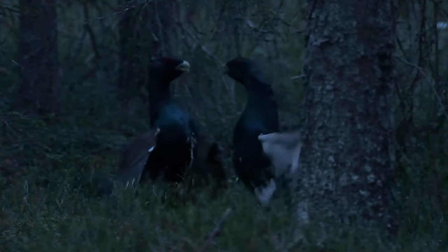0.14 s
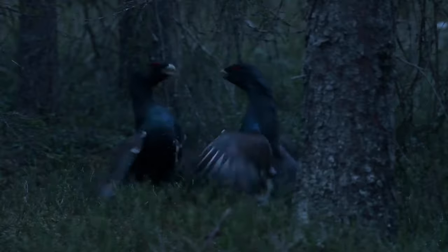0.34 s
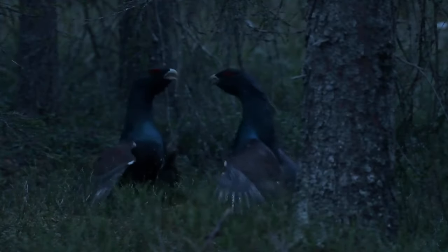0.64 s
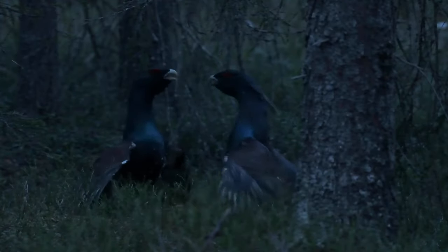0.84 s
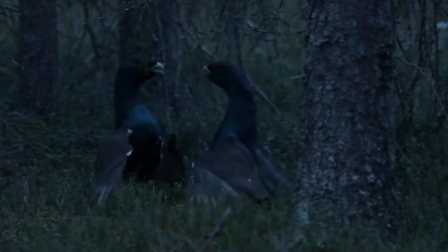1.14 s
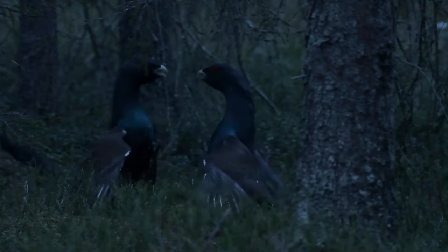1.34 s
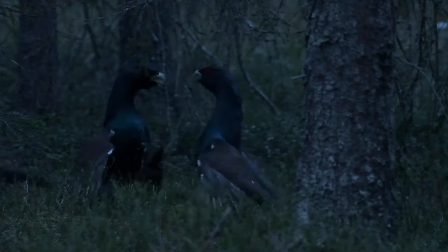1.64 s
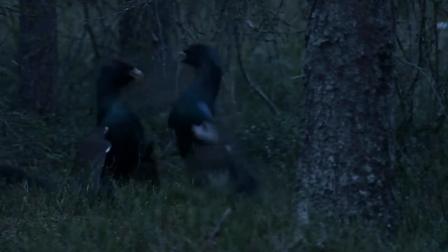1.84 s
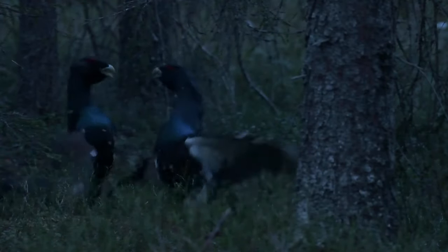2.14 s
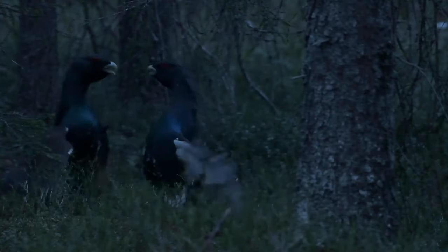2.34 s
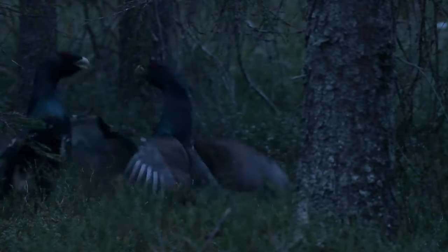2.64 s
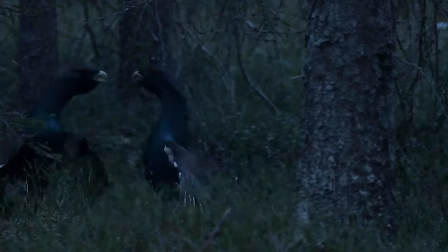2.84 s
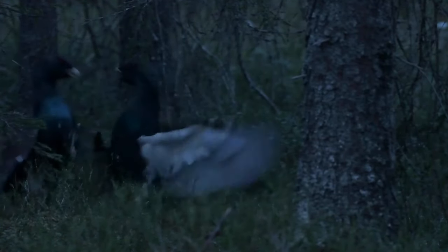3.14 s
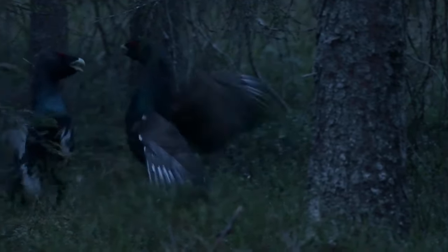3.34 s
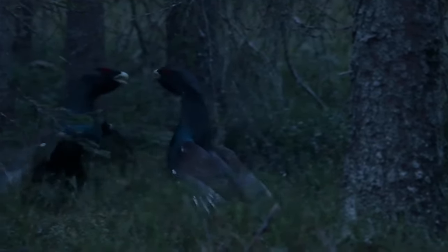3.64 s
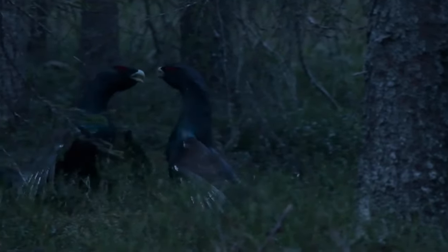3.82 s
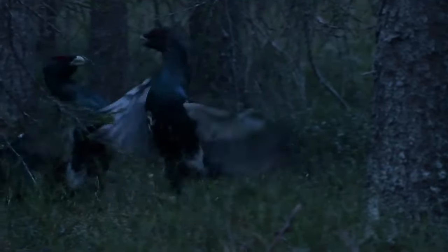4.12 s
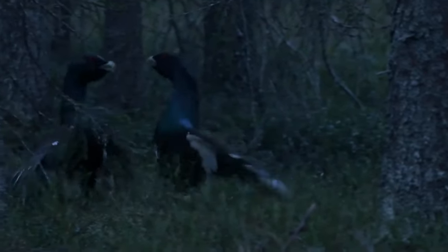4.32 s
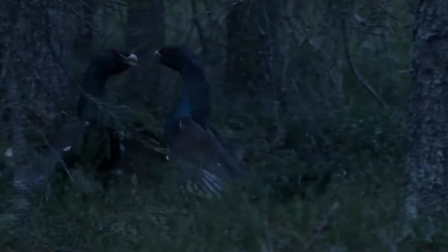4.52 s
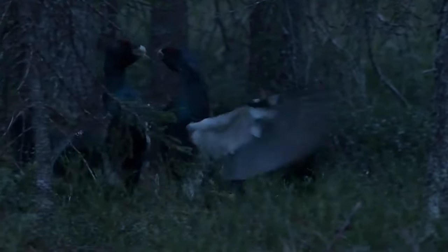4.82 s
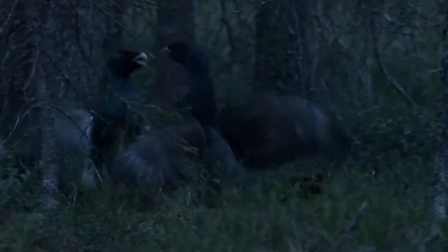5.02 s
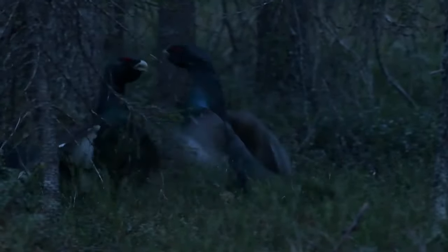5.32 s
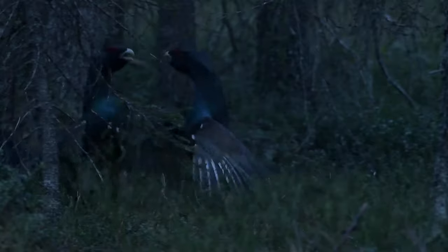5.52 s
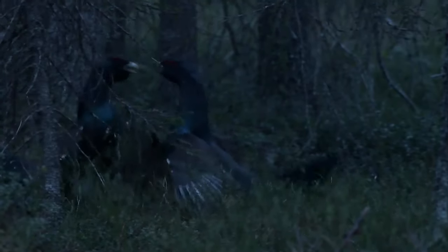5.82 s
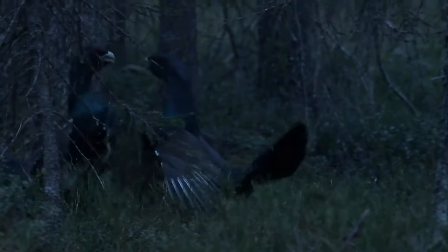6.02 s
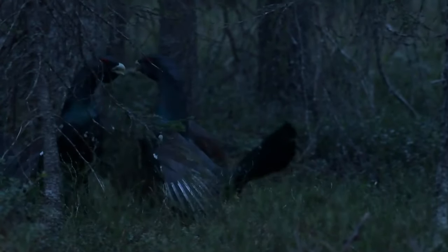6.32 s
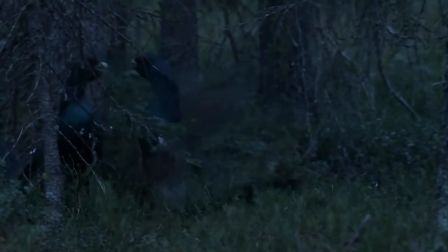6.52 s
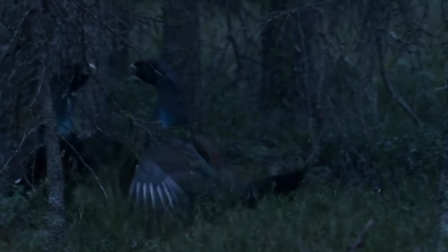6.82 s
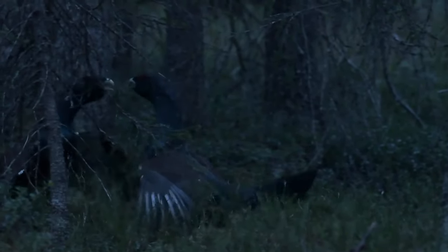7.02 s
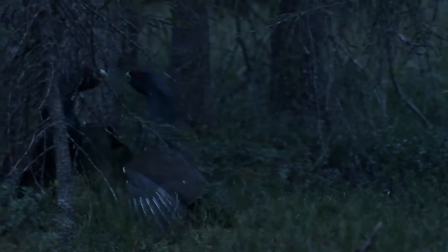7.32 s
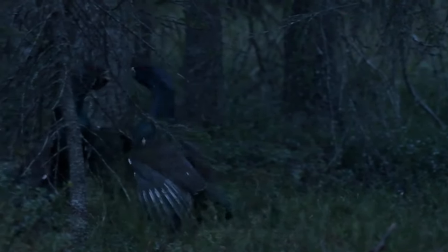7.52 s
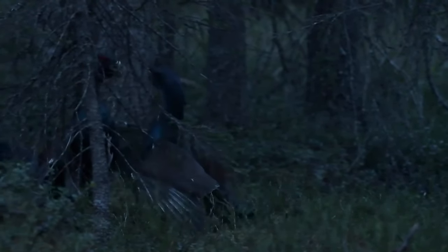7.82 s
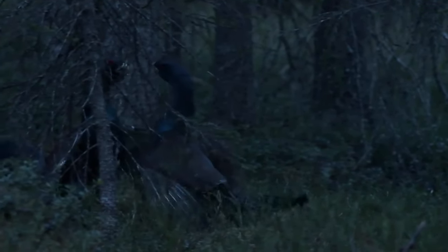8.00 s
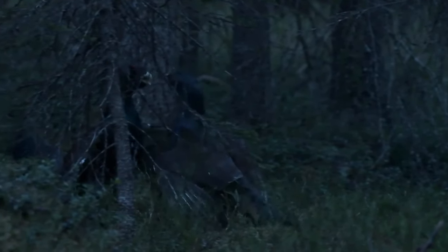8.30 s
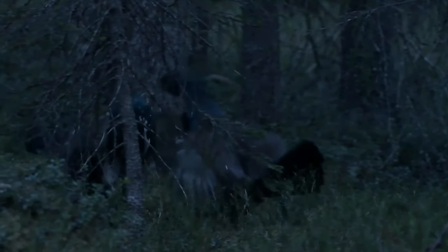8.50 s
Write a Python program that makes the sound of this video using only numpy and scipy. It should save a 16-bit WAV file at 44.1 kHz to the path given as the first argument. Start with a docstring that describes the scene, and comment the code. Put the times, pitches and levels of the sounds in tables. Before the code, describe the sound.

Quiet forest air with faint hiss; two large grouse cocks fight right of centre in the stereo picture. At 0.35 s a short wing swish ends in a sharp, crackling slap with a low chest thud and trailing feather rustle. Near stillness follows until a harder blow at 1.95 s, then another at 2.55 s amid shuffling feathers. A soft cluck and a brief wheeze lead to two quick strikes at 3.3 and 3.5 s; dull clucks follow at 3.7 s. A strong slap lands at 4.1 s, a cluck at 4.55 s, then a flurry from 4.95 to 5.4 s with loose quill snaps. Around 5.6-6.1 s come dry, bright throat clicks, a faint wheeze and popping clucks; more clucks run to 6.55 s. The last big blow hits at 6.65 s, crackling away. One low cluck at 7.2 s, then quiet until faint clucks, rustle and a tiny wheeze after 8.45 s. Trunks return faint, dull echoes.

```python
"""Moss among spruce trunks: two forest grouse cocks fight to the right of a small stereo microphone.
Wings sweep and rustle as grainy noise; blows slap with shaped noise over decaying chest tones, and
quills crack as short noise bursts. Between blows come dry throat clicks (gliding tones and resonant
snaps), low clucks (doubled pops) and short wheezes (resonant noise), with echoes, still air and hiss."""
import sys
import numpy as np
from scipy import signal
from scipy.fft import rfft, irfft
from scipy.io import wavfile
from scipy.ndimage import uniform_filter1d

SR = 44100
rng = np.random.default_rng(int(sys.argv[2]) if len(sys.argv) > 2 else 0)


def amplitude_ratio(level_db):
    """Convert a level in decibels to the matching linear amplitude (field) ratio."""
    exponent = np.asarray(level_db, float) / 20
    return 10 ** exponent


def transcribe(u):
    """Save the signal u as a 16-bit wav file named by the first command-line argument.

    u: samples, shape (n,) or (channels, n), limited to [-1, 1]; the rate is SR.
    q: integer samples, one column per channel.
    """
    v = np.clip(np.atleast_2d(u).T, -1, 1)
    q = np.round(v * 32767).astype(np.int16)
    wavfile.write(sys.argv[1], SR, q)


N = 381906  # samples

# Still air, shared and opposed parts. Each row: frequency in Hz, relative density in dB per Hz.
AIR_MID_HZ_DB = [(25, -14), (60, -7), (110, 0.5), (400, 1), (900, -2.5), (2000, -4.5), (6000, -8.5),
                 (10000, -12.5), (15000, -9)]
AIR_SIDE_HZ_DB = [(30, -8), (130, -37), (300, -18.5), (600, -8), (1900, -3), (6000, -9.5), (10000, -13),
                  (15000, -10.5)]
AIR_MID_RMS_DB = -64

# Wing strokes. Each row: impact in seconds, wind-up in seconds, wind-up level in dB,
# level of the flurry just after in dB, level of the trailing rustle in dB, brightness in dB.
STROKES = [(0.344, 0.17, -63, -47, -55.5, -4), (1.944, 0.09, -57.5, -35.5, -50.5, -6),
           (2.556, 0.11, -55.5, -47, -50.5, -6), (3.306, 0.11, -59, -43, -53.5, -3),
           (3.494, 0.084, -60.5, -44.5, -55.5, -2), (4.111, 0.08, -55, -36.5, -51, -3),
           (4.979, 0.11, -58.5, -42.5, -52.5, -0.5), (5.287, 0.15, -59.5, -45, -53.5, -0.5),
           (6.643, 0.13, -56, -44, -53.5, -1.5)]
WINDUP_RISE_DB, WINDUP_LOW_DB = 21.5, -4  # a swinging wing hisses higher than a settling one
FLURRY_LAG_S, FLURRY_DB_PER_S, TRAIL_DB_PER_S = 0.014, 382, 62.5
BRIGHT_DULLING_DB_PER_S, UPPER_DULLING_DB_PER_S = 10, 12  # added to the fall of the tail
LUMP_DB, LUMPS_PER_S = 1.6, 45
# Feathers shuffled without a blow. Each row: peak in seconds, level in dB, brightness in dB.
SHUFFLES = [(0.762, -76, -16), (2.36, -75, -1), (2.64, -57, -14), (3.0, -70, -4), (3.39, -67, 8),
            (3.73, -66.5, -7), (4.535, -64, 1), (8.475, -66, -7), (8.58, -73, 4)]
SHUFFLE_RISE_DB_PER_S, SHUFFLE_FALL_DB_PER_S = 144, 99
# Rustle spectrum. Each row: frequency in Hz, relative density in dB per Hz.
FEATHER_HZ_DB = [(150, -38), (250, -33), (538, -4.5), (711, 0.5), (1180, -4), (1310, -3), (1970, 1),
                 (3210, -10.5), (5760, -53), (7000, -9), (9100, -31), (15400, -120)]

# Wing blows. Each row: start in seconds, slap level in dB, thud level in dB, thud pitch in Hz.
BLOWS = [(0.344, -30, -37.3, 115), (0.749, -72, -55, 116), (1.898, -53, -53, 127), (1.945, -29.5, -37, 115),
         (2.505, -62, -55, 115), (2.556, -26.5, -36.5, 112), (3.308, -31.5, -31, 170),
         (3.494, -29.5, -44, 93.4), (4.072, -66, -53, 120), (4.111, -29.5, -37, 112),
         (4.935, -64, -55, 125), (4.979, -31.5, -32, 160), (5.154, -38, -36.5, 133), (5.233, -46, -52, 130),
         (5.286, -33.5, -37.5, 122), (5.804, -53, -56, 109), (6.545, -68, -60, 140),
         (6.644, -30, -38.5, 123), (7.226, -66, -60, 140)]
# Slap spectrum. Each row: frequency in Hz, relative density in dB per Hz.
SLAP_HZ_DB = [(150, -41), (250, -0.5), (1840, 2), (2460, 4.5), (2910, -21), (3840, -2), (4610, -14.5),
              (6350, -0.5), (7000, -15), (9100, -8.5), (15400, -120)]
# Chest resonances. Each row: frequency in Hz, width in Hz, gain in dB.
CHEST_MODES = [(102, 100, 6), (162, 72, -2), (260, 110, -26)]
SLAP_T60_S, THUD_T60_CYCLES = 0.069, 11.6

# Quill cracks, loud ones in the blows and faint ones standing alone.
# Each row: peak in seconds, level in dB, centre in Hz, brightness in dB.
CRACKS = [(0.3475, -31, 1800, -15), (0.351, -19.5, 2100, 1), (0.3713, -39, 1700, -6),
          (1.8996, -45, 1500, -8), (1.945, -25, 1400, -21), (1.9508, -17, 2027, -4),
          (1.956, -25, 1885, -12), (1.9647, -27, 1770, -20), (1.9809, -27.5, 1920, -20),
          (1.9835, -30, 1900, -3.5), (2.054, -39, 1980, -11), (2.0568, -37, 1620, -11),
          (2.4865, -47, 2500, 25), (2.511, -42, 1580, -10), (2.5155, -37.5, 1400, -16),
          (2.5567, -25, 1670, -14), (2.5605, -19, 2290, -5), (2.5796, -31, 1200, -6),
          (2.8262, -46, 1700, -2), (2.8684, -50, 2100, 7), (3.2649, -48, 1200, 3),
          (3.3102, -26.5, 1080, -27), (3.316, -21, 1400, -5), (3.3825, -39, 1750, 12),
          (3.3939, -41.5, 1900, 2), (3.4907, -32, 2300, 4), (3.4953, -19, 2070, -11), (3.499, -19, 2020, 0),
          (3.5107, -32, 1700, 3), (3.6512, -44.5, 2800, -5), (4.1134, -17.5, 1300, -22),
          (4.1166, -19, 1630, -11), (4.119, -21, 1890, -2), (4.1218, -24.5, 1980, -19),
          (4.144, -35, 1700, 9), (4.1533, -28.5, 1200, 3), (4.224, -34, 1800, -7), (4.5425, -43, 2200, -2),
          (4.9363, -44, 1900, -15), (4.9779, -26, 1300, -5), (4.9841, -20, 1600, -2),
          (5.1477, -44, 1200, -8), (5.1525, -32, 1520, -20), (5.156, -35, 1770, 2),
          (5.1621, -30.5, 2180, 2), (5.2277, -43, 2000, 8), (5.2345, -31.5, 1900, -8),
          (5.2863, -28, 2100, -4), (5.29, -30, 1920, -9), (5.3094, -28, 2400, 6),
          (5.3228, -30.5, 1400, -11), (5.3705, -39, 2200, -1), (5.3934, -41, 1800, -6),
          (5.4001, -33.5, 2000, -2), (5.4235, -40, 1920, -1), (6.6045, -47, 1900, -22),
          (6.6236, -39, 1900, 0), (6.6403, -30, 2000, 0), (6.6474, -24, 1640, -7), (6.6567, -33, 2400, -6),
          (6.7375, -34.5, 2420, -2), (6.757, -35.5, 2420, -8), (6.777, -42, 1610, 3),
          (6.888, -50, 2500, 12), (8.459, -49, 1500, -8), (8.4645, -48, 1710, -10), (8.489, -49, 1700, -5)]
CRACK_T60_S, FAINT_T60_S_PER_DB = 0.005, 0.0002  # fainter cracks last longer
# Cracks scattered after each stroke; the level is relative to its trailing rustle.
LOOSE_MEAN_DELAY_S, LOOSE_DB, LOOSE_SPREAD_DB = 0.07, 8, 3.5
LOOSE_HZ, LOOSE_BRIGHT_DB = 1600, -5.5

# Low clucks. Each row: start in seconds, pop level in dB, pitch in Hz, hiss level in dB, squeak level in dB.
CLUCKS = [(3.094, -65.5, 760, -54, -64), (3.7, -49, 703, -54.5, -53.5), (3.712, -55, 680, -53, -54.5),
          (3.756, -66, 610, -60, -59), (4.562, -56, 680, -56, -62.5), (5.779, -48, 690, -50.5, -61.5),
          (5.812, -57, 640, -68, -70), (5.91, -73.5, 805, -48.5, -66), (6.242, -54.5, 684, -68.5, -67.5),
          (6.267, -52.5, 770, -60.5, -71), (6.285, -46.5, 680, -51.5, -63), (6.415, -50.5, 675, -73, -69.5),
          (6.467, -69, 641, -57.5, -65.5), (6.543, -55.5, 660, -60.5, -67.5),
          (7.226, -54.5, 680, -49.5, -63), (8.457, -56, 736, -68.5, -61), (8.487, -53, 740, -55.5, -62.5)]
# Cluck hiss and squeak resonances. Each row: frequency in Hz, width in Hz, gain in dB.
CLUCK_HISS_MODES = [(1400, 2700, -10), (6140, 940, 1.5), (7950, 1100, 4), (10000, 1300, -4),
                    (12400, 1000, -12)]
SQUEAK_MODES = [(3700, 200, 0)]

# Wheezes. Each row: start in seconds, length in seconds, level in dB, swell from start to end in dB.
WHEEZES = [(3.173, 0.065, -55.5, -4.5), (5.565, 0.083, -63, 6), (8.614, 0.02, -59, -3)]
# Throat resonances. Each row: frequency in Hz, width in Hz, gain in dB.
BREATH_MODES = [(2120, 300, 0), (2720, 300, -13), (5000, 1200, -7)]
WHEEZE_EDGE_S = 0.0068

# Throat clicks. Each row: start in seconds, ring level in dB, settled pitch in Hz,
# ring time constant in seconds, snap peak in dB.
CLICKS = [(5.6444, -29.5, 1990, 0.0055, -22), (5.6605, -28.3, 1910, 0.002, -46.5),
          (5.7939, -37.5, 1940, 0.0025, -44.5), (5.8582, -57, 2000, 0.0049, -60),
          (6.127, -26.5, 1970, 0.0045, -23.5)]
# Snap resonances. Each row: frequency in Hz, width in Hz, gain in dB.
SNAP_MODES = [(1300, 600, -14), (2680, 990, 6), (3600, 900, -7), (4740, 740, 3.5), (6600, 810, -9),
              (8600, 1500, -6)]

# Difference between the ports. Each row: frequency in Hz, share from 0 to 1.
FACING_HZ_SHARE = [(200, 0), (400, 0.1), (700, 0.4), (1300, 0.75), (2400, 1.), (4400, 0.63), (8000, 1.),
                   (14000, 0.7)]
# Phase spread of that difference. Each row: frequency in Hz, spread in radians at scatter 1.
SCATTER_HZ_RAD = [(300, .1), (700, 0.53), (1400, 0.34), (3000, 0.84), (7000, 0.59), (12000, 3.8)]
FOREST_T60_S, FOREST_DB = 0.56, -22

# Treble response. Each row: frequency in Hz, gain in dB.
TREBLE_HZ_DB = [(6300, 0.5), (7100, -2), (8300, -7), (12000, -3.5), (15000, -10.5)]
# Narrow treble gaps. Each row: frequency in Hz, width in Hz, depth in dB.
GAPS = [(7630, 406, 17.5), (9630, 228, 27)]
TOP_HZ = 15740


def on_hz(table, n):
    """A (Hz, value) table interpolated over log frequency on the bins of an n-point transform."""
    hz, value = np.transpose(table)
    return np.interp(np.log(np.fft.rfftfreq(n, 1 / SR) + 1), np.log(hz), value)


def colour(x, db):
    """Gain in dB on every bin."""
    return irfft(rfft(x) * amplitude_ratio(db), x.shape[-1])


def unit(x):
    """Scaled to rms 1."""
    return x / np.sqrt(np.mean(x ** 2, axis=-1, keepdims=True))


def band(x, lo_hz, hi_hz):
    """Band-pass."""
    return signal.sosfilt(signal.butter(2, [lo_hz, hi_hz], "bandpass", fs=SR, output="sos"), x)


def low_pass(hz):
    """Second-order low-pass sections."""
    return signal.butter(2, hz, fs=SR, output="sos")


def resonate(x, modes):
    """Sum of two-pole resonances (Hz, width in Hz, dB)."""
    return sum(amplitude_ratio(db) * signal.lfilter(*signal.iirpeak(hz, hz / width_hz, SR), x)
               for hz, width_hz, db in modes)


def fade(length_s, t60_s, rise_s):
    """Quick rise, exponential decay."""
    t = np.arange(int(length_s * SR)) / SR
    return (1 - np.exp(-t / rise_s)) * amplitude_ratio(-60 * t / t60_s)


def add(track, start_s, sound):
    """Mix a sound into the track."""
    i = int(start_s * SR)
    track[..., i:i + sound.shape[-1]] += sound[..., :N - i]


def grainy(grains_per_s, spread_db):
    """Noise whose level jumps from grain to grain, as barbs slip past each other."""
    k = int(SR / grains_per_s)
    jumps = np.minimum(rng.exponential(size=N // k + 1), 3)
    smooth = uniform_filter1d(np.repeat(jumps, k), k // 2)[:N]
    return rng.standard_normal(N) * amplitude_ratio(spread_db * smooth)


def place(x, rightward, scatter):
    """Ports alike in the bass; higher up the left is shadowed and housing detours scatter the phase."""
    detours_s, turns = rng.uniform(0.00021, 0.0014, (6, 1)), rng.uniform(0, 1, (6, 1))
    ripple = np.cos(2 * np.pi * (detours_s * np.fft.rfftfreq(N, 1 / SR) + turns)).sum(axis=0)
    phase_rad = scatter * on_hz(SCATTER_HZ_RAD, N) * unit(ripple)
    lean = rightward * on_hz(FACING_HZ_SHARE, N) * np.exp(1j * phase_rad)
    side = irfft(rfft(x) * lean, N)
    return np.array([x - side, x + side])


def air():
    """Still air and hiss: bass shared by both ports, treble unrelated, left port a little fainter."""
    mid = colour(rng.standard_normal(N), on_hz(AIR_MID_HZ_DB, N))
    side = colour(rng.standard_normal(N), on_hz(AIR_SIDE_HZ_DB, N))
    side = side - 0.16 * band(mid, 800, 11000)
    return amplitude_ratio(AIR_MID_RMS_DB) / np.std(mid) * np.array([mid + side, mid - side])


def feather_power():
    """Low, upper and bright rustle power: a swelling wind-up, a quick flurry, a long trail that dulls."""
    t = np.arange(0, N / SR, .001)
    power = np.zeros((3, len(t)))
    for s, windup_s, windup_db, flurry_db, trail_db, bright_db in STROKES:
        before_s = np.clip(s - t, 0, None)
        after_s = np.clip(t - s - FLURRY_LAG_S, 0, None)
        windup = amplitude_ratio(windup_db - WINDUP_RISE_DB * (before_s / windup_s) ** 2) ** 2 * (t < s)
        flurry = amplitude_ratio(flurry_db - FLURRY_DB_PER_S * after_s) ** 2
        trail = amplitude_ratio(trail_db - TRAIL_DB_PER_S * after_s) ** 2
        tail = (flurry + trail) * (after_s > 0)
        power += [windup * amplitude_ratio(WINDUP_LOW_DB) ** 2 + tail,
                  windup + tail * amplitude_ratio(-UPPER_DULLING_DB_PER_S * after_s) ** 2,
                  (windup + tail) * amplitude_ratio(bright_db - BRIGHT_DULLING_DB_PER_S * after_s) ** 2]
    for s, db, bright_db in SHUFFLES:
        fall_db = np.where(t < s, SHUFFLE_RISE_DB_PER_S * (s - t), SHUFFLE_FALL_DB_PER_S * (t - s))
        dull = amplitude_ratio(db - fall_db) ** 2
        power += [dull, dull, dull * amplitude_ratio(bright_db) ** 2]
    return [np.interp(np.arange(N) / SR, t, part) for part in uniform_filter1d(power, size=4, axis=1)]


def lumps():
    """Slow random gain, as bundles of feathers catch and let go."""
    k = int(SR / LUMPS_PER_S)
    steps = np.repeat(rng.standard_normal(N // k + 1), k)
    return amplitude_ratio(LUMP_DB * uniform_filter1d(steps, k // 2)[:N])


def rustle():
    """Feather noise in a low and an upper grainy part and a bright one, each lumping on its own."""
    feather = colour(grainy(500, 1.5), on_hz(FEATHER_HZ_DB, N))
    dull = signal.sosfilt(low_pass(2800), feather)
    dull = dull / np.std(band(dull, 600, 4200))
    low = signal.sosfiltfilt(low_pass(1500), dull)
    upper = dull - low
    bright = band(grainy(700, 2.5), 2460, 8500)
    bright = bright / np.std(band(bright, 3400, 6900))
    gains = np.sqrt(np.abs(feather_power()))
    return sum(part * gain * lumps() for part, gain in zip((low, upper, bright), gains))


def blows():
    """Each wing blow: a crackling slap, the short ring of the struck chest and its loose rumble after."""
    out, t = np.zeros(N), np.arange(int(.3 * SR)) / SR
    slap = unit(colour(grainy(980, 1.0), on_hz(SLAP_HZ_DB, N)))
    rumble = unit(resonate(rng.standard_normal(N), CHEST_MODES))
    for s, slap_db, thud_db, hz in BLOWS:
        i = int(s * SR)
        ring = np.sin(2 * np.pi * hz * t) + 0.28 * np.sin(2 * np.pi * 2.01 * hz * t) * amplitude_ratio(-300 * t)
        chest = ring * fade(.3, THUD_T60_CYCLES / hz, 0.003)
        chest = chest + 0.2 * rumble[i:i + len(t)] * fade(.3, 0.34, 0.025)
        hit = slap[i:i + len(t)] * fade(.3, SLAP_T60_S, 0.0012)
        add(out, s, amplitude_ratio(thud_db) * chest + amplitude_ratio(slap_db) * hit)
    return out


def loose_cracks(count):
    """Random rows like those of CRACKS, thinning out and fading with the trail of each stroke."""
    rows = []
    for stroke, chance in zip(STROKES, rng.standard_normal((len(STROKES), count, 5))):
        impact_s, trail_db = stroke[0], stroke[4]
        delay_s = .5 * LOOSE_MEAN_DELAY_S * (chance[:, 0] ** 2 + chance[:, 1] ** 2)
        db = trail_db + LOOSE_DB - TRAIL_DB_PER_S * delay_s + LOOSE_SPREAD_DB * chance[:, 2]
        centre_hz = LOOSE_HZ * np.exp(.22 * chance[:, 3])
        bright_db = LOOSE_BRIGHT_DB + 6 * chance[:, 4]
        rows += zip(impact_s + FLURRY_LAG_S + delay_s, db, centre_hz, bright_db)
    return rows


def cracks():
    """A quill snaps: a few milliseconds of noise, a dull knock round its centre with a bright edge."""
    out, hz = np.zeros(N), np.fft.rfftfreq(512, 1 / SR) + 1
    edge = np.exp(-(np.log2(hz / 5200) / 0.53) ** 2) + 0.44 * (hz > 7000) * np.exp(-(hz / 13500) ** 4)
    rows = CRACKS + loose_cracks(count=9)
    for (s, db, centre_hz, bright_db), noise in zip(rows, rng.standard_normal((len(rows), 512))):
        knock = np.exp(-(np.log2(hz / centre_hz) / 0.95) ** 2)
        t60_s = CRACK_T60_S + FAINT_T60_S_PER_DB * max(-25 - db, 0)
        burst = rfft(noise * np.roll(fade(512.5 / SR, t60_s, .0001), shift=60))
        snap = unit(irfft(burst * knock)) + amplitude_ratio(bright_db) * unit(irfft(burst * edge))
        power = uniform_filter1d(snap ** 2, size=30)
        peak_s = power.argmax() / SR
        add(out, s - peak_s, snap * amplitude_ratio(db) / np.sqrt(2 * power.max()))
    return out


def forest(x):
    """Scattered echoes off the trunks, dull and unlike in the two ports."""
    echoes = rng.standard_normal((2, int(.6 * SR))) * fade(.6, FOREST_T60_S, 0.0017)
    echoes = band(echoes, 580, 5500)
    echoes = echoes / np.sqrt(np.sum(echoes ** 2, axis=-1, keepdims=True))
    return amplitude_ratio(FOREST_DB) * signal.fftconvolve(x, echoes, axes=-1)[:, :N]


def clucks():
    """A dull pop of a few cycles, again fainter 9 ms later, with a thin hiss and a squeak on top."""
    out, t = np.zeros(N), np.arange(2048) / SR
    for (s, db, hz, hiss_db, squeak_db), noise in zip(CLUCKS, rng.standard_normal((len(CLUCKS), 2048))):
        tone = np.sin(2 * np.pi * hz * t) + 0.17 * np.sin(4 * np.pi * hz * t + 1)
        wave = tone + 0.3 * unit(band(noise, 400, 1000))
        pop = wave * np.exp(-((t - .003) / 0.0031) ** 2)
        pop = pop + 0.38 * np.roll(pop, int(0.0092 * SR))
        hiss = amplitude_ratio(hiss_db) * unit(resonate(noise, CLUCK_HISS_MODES))
        squeak = amplitude_ratio(squeak_db) * unit(resonate(resonate(noise, SQUEAK_MODES), SQUEAK_MODES))
        add(out, s, amplitude_ratio(db) * pop + (hiss + squeak) * fade(2048 / SR, 0.063, .001))
    return place(out, 0.66, 1.1)


def wheeze_gain():
    """Each wheeze swells or sags evenly in dB between soft edges."""
    t, gain = np.arange(N) / SR, np.zeros(N)
    for s, length_s, db, swell_db in WHEEZES:
        edges = np.clip(np.minimum(t - s, s + length_s - t) / WHEEZE_EDGE_S, 0, 1)
        gain += edges * amplitude_ratio(db + swell_db * np.clip((t - s) / length_s, 0, 1))
    return gain


def wheezes():
    """Breath noise pushed through the throat, resonating twice, the second time more broadly."""
    broad_modes = [(hz, 2 * width_hz, 0) for hz, width_hz, _ in BREATH_MODES]
    breath = resonate(resonate(grainy(200, 0.52), BREATH_MODES), broad_modes)
    return unit(breath) * wheeze_gain()


def clicks():
    """Throat click: a bright resonant snap and a short ring that drops in pitch."""
    out, t = np.zeros(N), np.arange(1024) / SR
    for (s, db, hz, ring_s, snap_db), noise in zip(CLICKS, rng.standard_normal((len(CLICKS), 1024))):
        pitch_hz = hz * (1 + .3 * np.exp(-t / .001))
        envelope = (1 - np.exp(-t / 0.00016)) * np.exp(-(t / ring_s) ** 2)
        ring = np.sin(2 * np.pi * np.cumsum(pitch_hz) / SR) * envelope
        snap = band(resonate(noise * fade(1024 / SR, 0.011, 0.0003), SNAP_MODES), 650, 11000)
        add(out, s, amplitude_ratio(db) * ring + amplitude_ratio(snap_db) * snap / np.abs(snap).max())
    return out


def scene():
    """Wings and voices, their echoes and the air."""
    wings = place(rustle() + blows() + cracks(), 0.76, 0.96)
    voices = clucks() + place(wheezes() + clicks(), 1.0, 0.66)
    # the voices are quiet and aimed forward, so the trunks return less of them
    return wings + voices + forest(wings + 0.28 * voices) + air()


def top_cut(x):
    """Nothing passes above the cut-off."""
    return signal.sosfilt(signal.butter(12, 16460, fs=SR, output="sos"), x)


def record(dry):
    """The treble steps down above 7 kHz, has two narrow gaps and ends below 16 kHz."""
    hz = np.fft.rfftfreq(N, 1 / SR)
    gaps_db = sum(depth_db * np.exp(-((hz - gap_hz) / width_hz) ** 2) for gap_hz, width_hz, depth_db in GAPS)
    response_db = on_hz(TREBLE_HZ_DB, N) - gaps_db - 60 * (hz > TOP_HZ)
    mix = colour(dry, response_db)
    return top_cut(mix)


dry = scene()
out = record(dry)
transcribe(out)
```